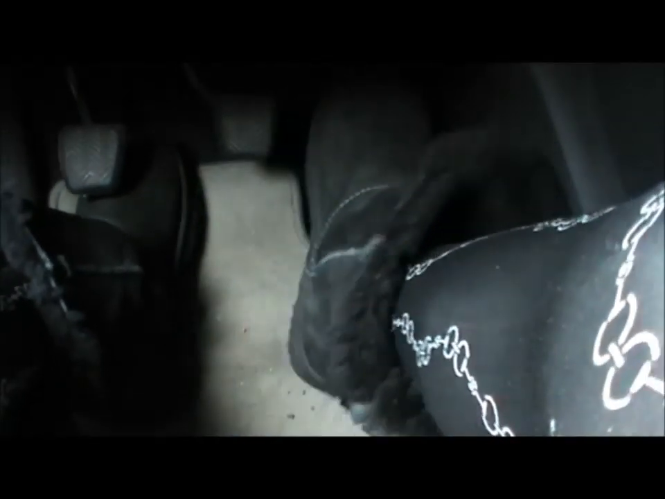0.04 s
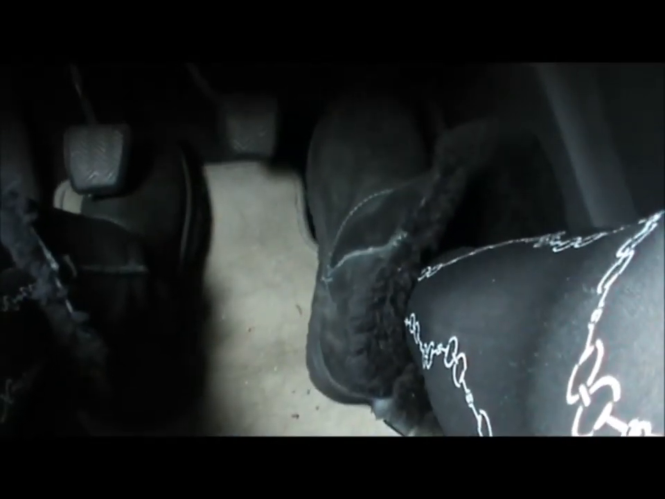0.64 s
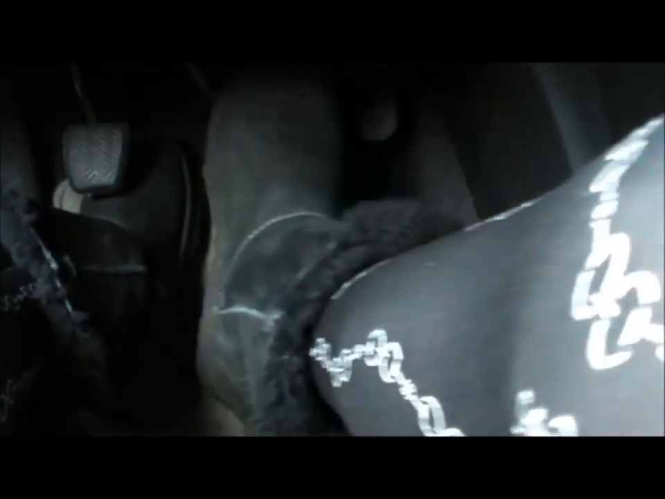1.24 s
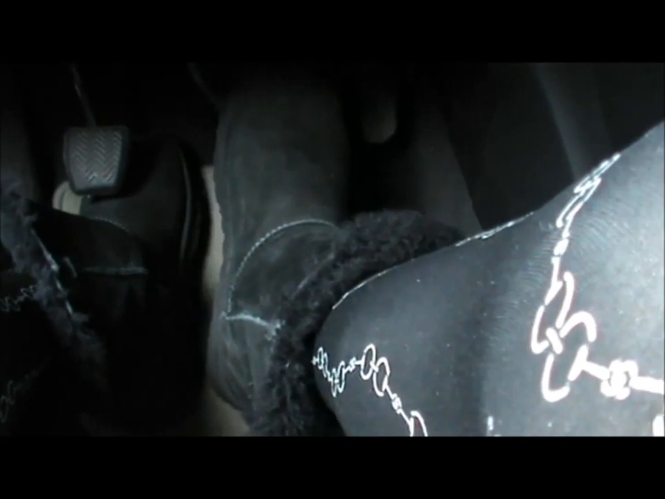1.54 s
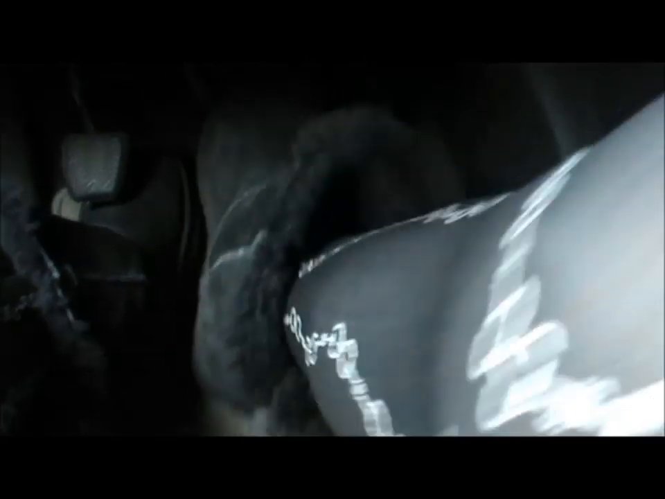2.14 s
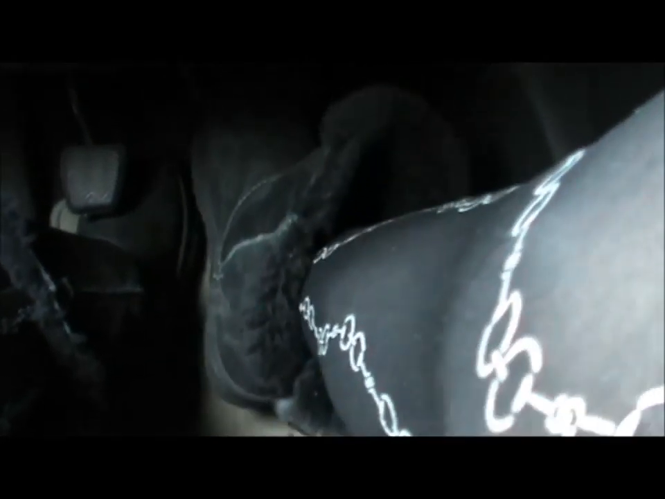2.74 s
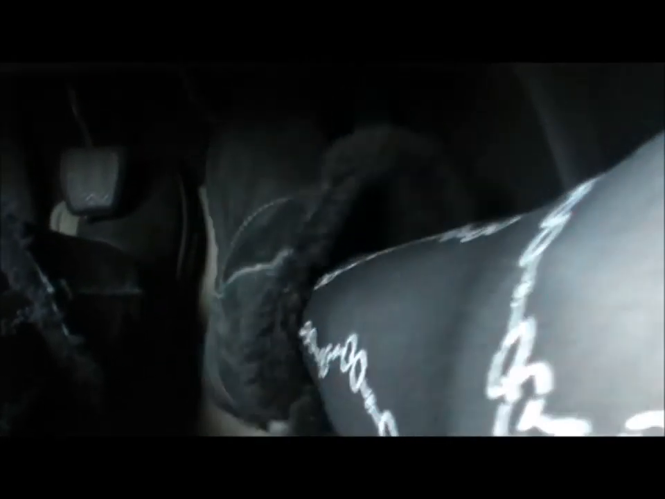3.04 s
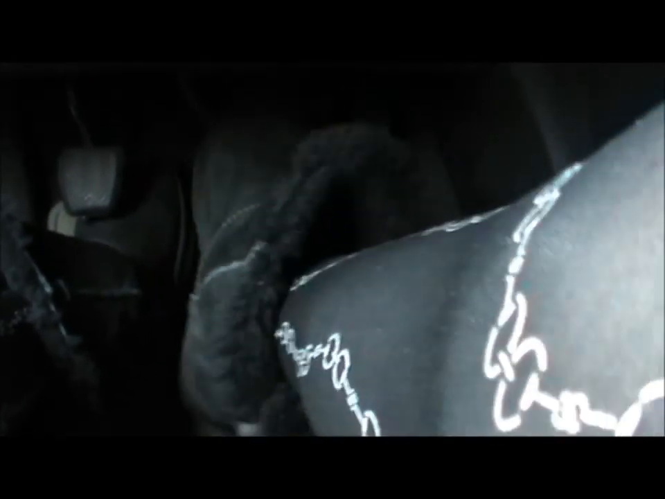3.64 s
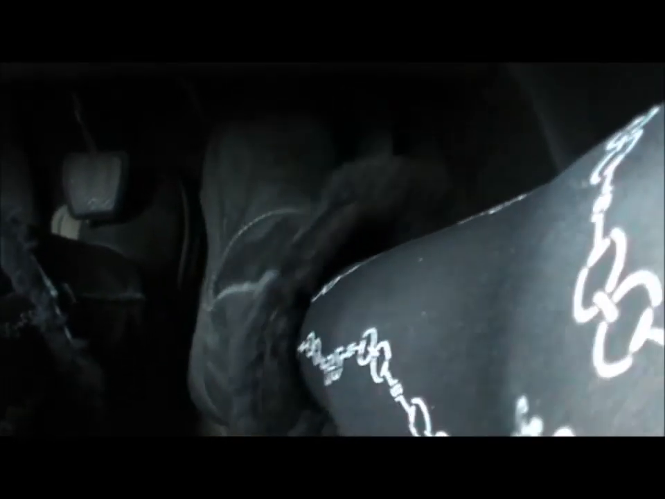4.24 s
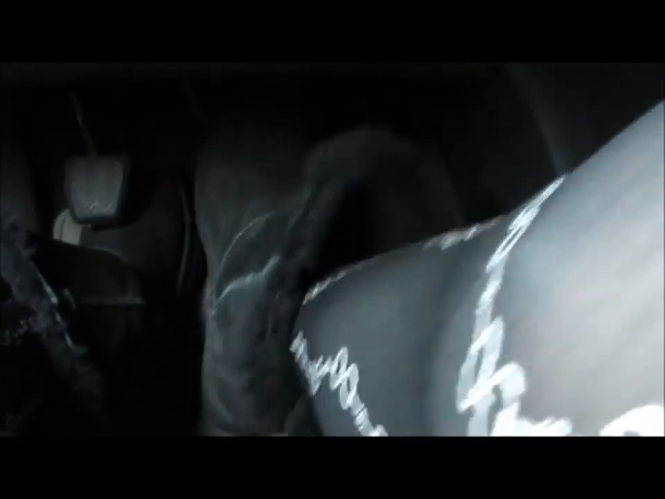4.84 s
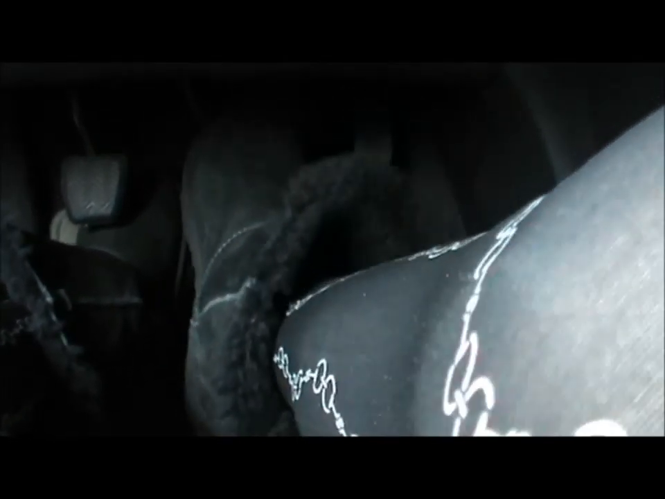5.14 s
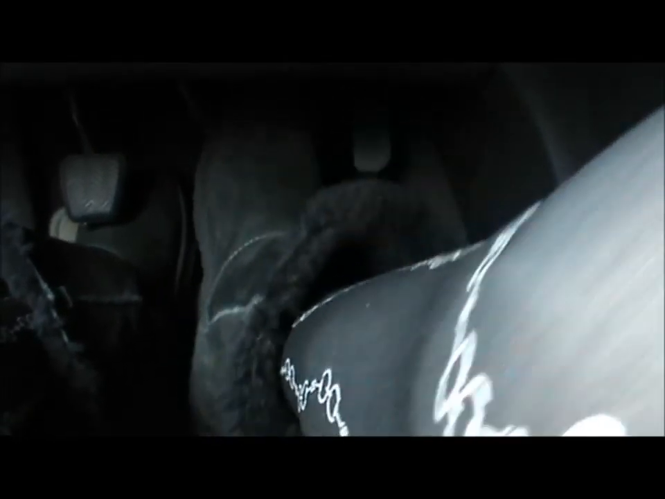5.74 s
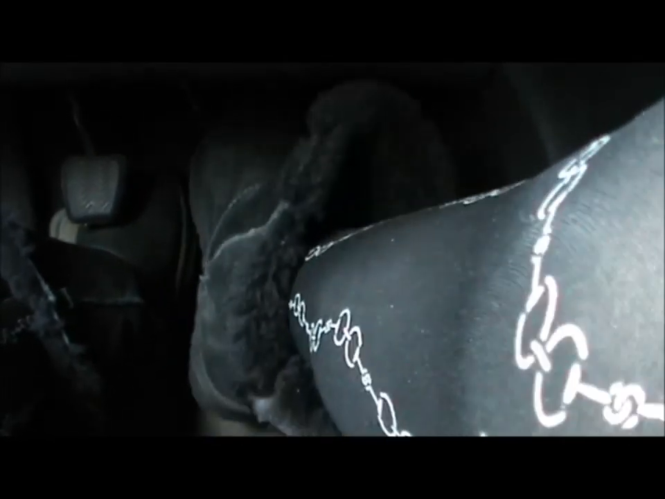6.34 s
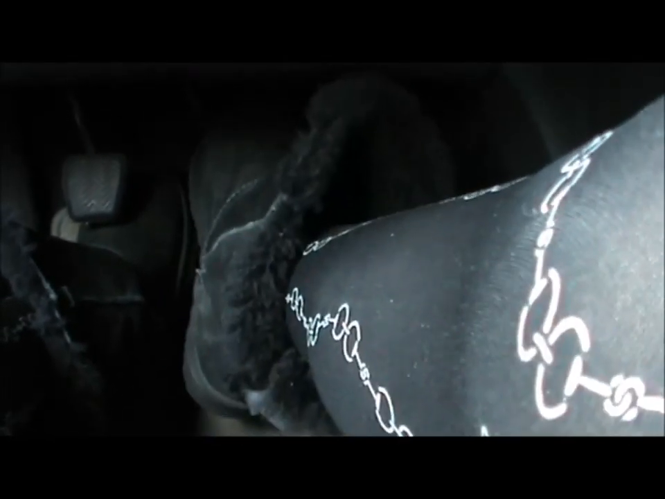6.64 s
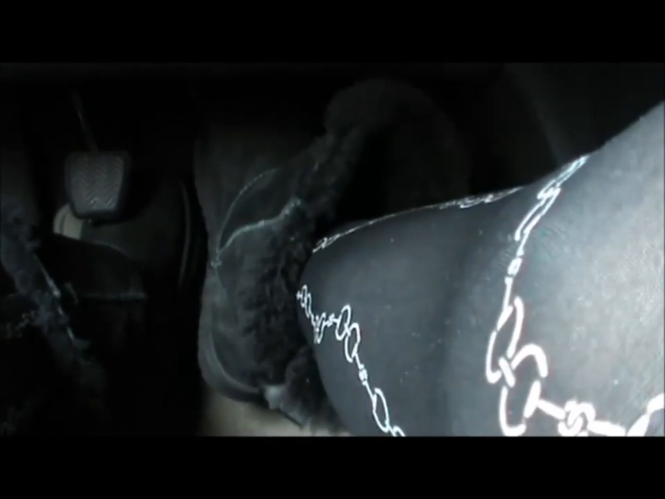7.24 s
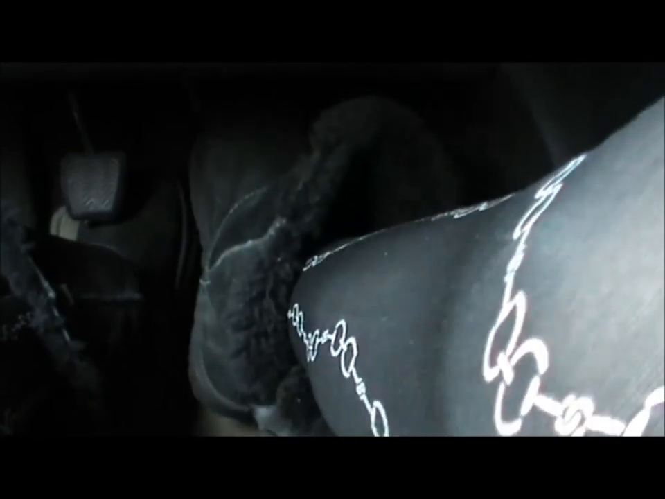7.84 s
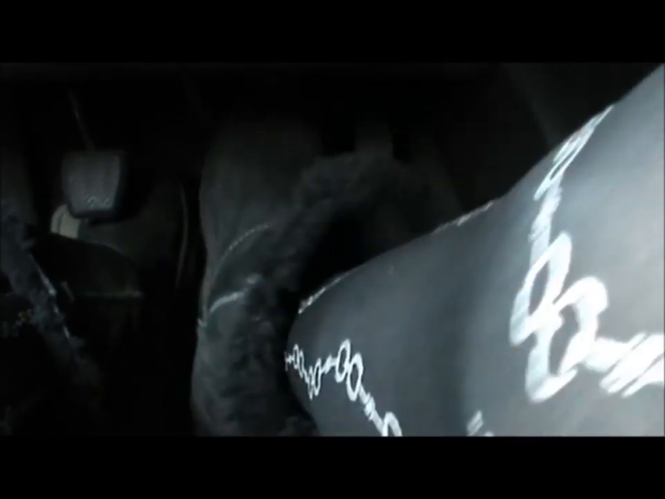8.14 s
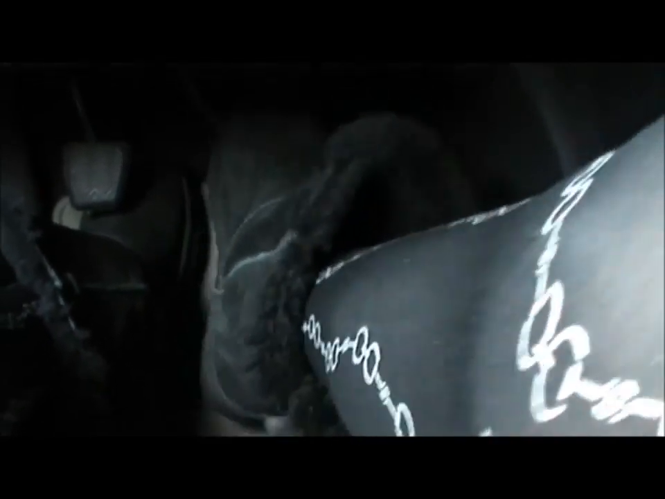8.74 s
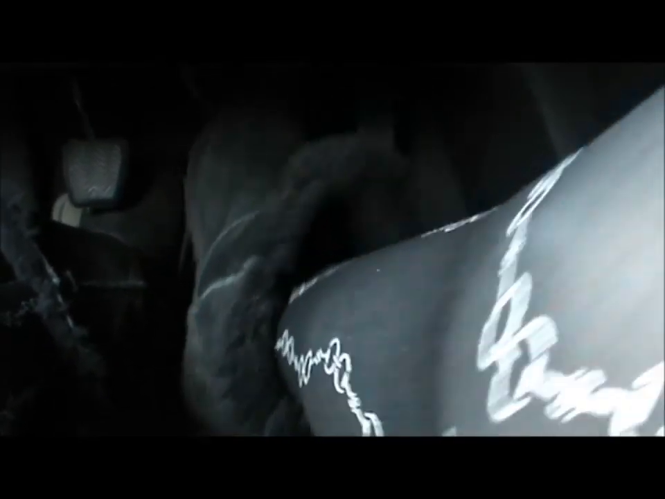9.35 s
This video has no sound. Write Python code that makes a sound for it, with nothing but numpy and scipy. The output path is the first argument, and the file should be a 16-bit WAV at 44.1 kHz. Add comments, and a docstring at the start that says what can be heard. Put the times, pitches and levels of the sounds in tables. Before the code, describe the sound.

Heard close up in a car's footwell, the engine gives one quick rev and settles to a low idle. A foot then pumps the brake pedal about three times a second. Each push makes a sharp click and a short rattling thump, and each release a hollow knock with a brief hiss of air. Two thin, faint squeaks come as the pumping starts. The strokes slow briefly, then quicken again.

```python
"""A foot pumps the brake pedal of an idling car, after one quick rev of the engine.
Each push clicks the pedal's linkage and shakes the box that holds the pedal. When let go, the pedal
knocks against its stop, and the brake booster (which helps the foot press) sucks a short hiss of air
through a valve that squeaks twice. Underneath, the engine's firings boom in the cabin."""
import sys
import numpy as np
from scipy import signal
from scipy.fft import rfft, irfft, next_fast_len
from scipy.io import wavfile
from scipy.ndimage import uniform_filter1d

SR = 44100
rng = np.random.default_rng(int(sys.argv[2]) if len(sys.argv) > 2 else 0)


def put_to_file(sound):
    """Save the sound as 16-bit audio at rate SR, in the file named by the first command-line argument."""
    columns = np.atleast_2d(sound).T  # one column per channel
    safe = np.clip(columns, -1, 1)
    whole_steps = np.round(safe * 32767)
    wavfile.write(sys.argv[1], SR, whole_steps.astype(np.int16))


N = 413658
TIME = np.arange(N) / SR
AGE = np.arange(SR * 2 // 5) / SR   # seconds since one short sound began
BINS = np.maximum(np.fft.rfftfreq(next_fast_len(N), 1 / SR), 1)


def from_db(db):
    return 10 ** (np.asarray(db) / 20)


def at_hz(points, hz):
    """Read a table at any pitch, sliding smoothly between its rows."""
    pitches, values = np.transpose(points)
    return np.interp(np.log(hz), np.log(pitches), values)


def drift(turns_per_s):
    """A random wander, mostly between -1 and 1."""
    knots = rng.standard_normal(int(N / SR * turns_per_s) + 2)
    return np.interp(TIME * turns_per_s, np.arange(len(knots)), knots)


def treble_share(hz):
    """0 in the bass, 1 in the treble."""
    return hz ** 2 / (hz ** 2 + 900 ** 2)


# How alike left and right sound. Each row: pitch in Hz, likeness from 0 to 1.
LIKENESS = [(60, 1), (500, 1), (800, 0.61), (1500, 0.56), (2200, 0.22), (6000, 0.48), (9000, 0.19),
            (15000, 0.33)]

def stereo(mid, side, hz):
    """Mix two unrelated noises into left and right, less alike in the treble."""
    alike = np.sqrt(np.clip(at_hz(LIKENESS, hz), 0, .999))
    mid, side = mid * np.sqrt(1 + alike), side * np.sqrt(1 - alike)
    return np.array([mid + side, mid - side])


def steady_noise(spectrum):
    """Even stereo noise with the given tone colour, at an average strength of 1."""
    mid, side = rfft(rng.standard_normal((2, next_fast_len(N)))) * from_db(at_hz(spectrum, BINS))
    noise = irfft(stereo(mid, side, BINS))[:, :N]
    return noise / np.sqrt(np.mean(noise ** 2) + 1e-20)


def bursts(starts, spectrum, envelope, spread_db=1.43):
    """A hit rings so many notes that they blur into noise; envelope(hz) shapes each band over time."""
    edges = 44 * 2 ** (np.arange(18) / 2)   # Hz, half an octave apart
    centres = np.sqrt(edges[1:] * edges[:-1])
    gains = from_db(at_hz(spectrum, centres))
    gains /= np.sqrt(np.sum(gains ** 2 * np.diff(edges)) * 2 / SR)
    size = envelope(centres[0]).shape[1]
    white, sounds = rng.standard_normal((len(starts), 2, 2, size)), 0
    for k, hz in enumerate(centres):
        bandpass = signal.butter(2, edges[k:k + 2], "band", fs=SR, output="sos")
        band = signal.sosfilt(bandpass, white[:, k % 2])
        colour = from_db(spread_db * rng.standard_normal((len(starts), 1)))   # no two hits are alike
        sounds = sounds + stereo(band[:, 0], band[:, 1], hz) * (gains[k] * colour * envelope(hz))
    out = np.zeros((2, N + size))
    for k, start in enumerate(starts):
        at = max(int(start * SR), 0)
        out[:, at:at + size] += sounds[:, k]
    return out[:, :N]


def strike(times, db, treble_db, notes, spread_db):
    """Each tap rings all the notes of a part, each with a strength of its own."""
    at, out = np.clip((times * SR).astype(int), 0, N - 1), np.zeros(N)
    chance_db = spread_db * rng.standard_normal((len(at), len(notes)))
    for k, (hz, note_db, ring_s) in enumerate(notes):
        taps = np.full(N, 1e-18)
        taps[at] = (-1) ** k * from_db(db + note_db + treble_db * treble_share(hz) + chance_db[:, k])
        fade, turn = np.exp(-np.log(1000) / (ring_s * SR)), 2 * np.pi * hz / SR
        out += signal.lfilter([0, np.sin(turn)], [1, -2 * fade * np.cos(turn), fade * fade], taps)
    return out


def resonate(sound, resonances):
    """Boost a sound around the pitches at which a part likes to ring."""
    for hz, width_hz, boost_db in resonances:
        b, a = signal.iirpeak(hz, hz / width_hz, fs=SR)
        sound = sound + (from_db(boost_db) - 1) * signal.lfilter(b, a, sound + 1e-18)
    return sound


# The engine's speed during the rev. Each row: time in seconds, firings per second.
REV = [(0.62, 30.6), (0.69, 36.6), (0.96, 64.3), (1.0, 69.6), (1.09, 68.7), (1.32, 57.9), (1.92, 40.3),
       (2.06, 32.7), (2.32, 29.5), (2.7, 27.7)]
IDLE_HZ, REV_START_S, REV_END_S = 25.6, .5, 3.1

def firing_rate():
    """Firings per second: idle, one quick rev, and back to idle."""
    times, rates = np.transpose([(REV_START_S, IDLE_HZ), *REV, (REV_END_S, IDLE_HZ)])
    return np.interp(TIME, times, rates)


def engine_levels(firing, revved, full_load_hz_per_s=165):
    """Boom and clatter in dB: both grow with speed; speeding up hard trades boom for clatter."""
    load = np.clip(np.gradient(firing) * SR / full_load_hz_per_s, 0, 1)
    load = uniform_filter1d(load, size=SR // 10)
    before_rev = np.interp(TIME, [REV_START_S, TIME[np.argmax(firing)]], [1, 0])
    boom_db = -36 + 12 * revved - 4.5 * load
    clatter_db = -39.5 + 2.5 * np.log2(firing / IDLE_HZ) + 4.5 * load - 3 * before_rev
    return boom_db, clatter_db


# The engine's tones. Each row: multiple of the firing rate, relative dB at idle, the same when revved.
ENGINE_TONES = [(1, -3, -2), (1.5, -22, -18), (2, -1, -12), (3, -22, -17), (3.5, -22, -23), (4, -17, -23),
                (5, -16, -25), (7, -16, -29), (10.5, -15, -30)]
# Pitches at which the cabin booms. Each row: pitch in Hz, width in Hz, boost in dB.
CABIN = [(53.5, 3, 2.5), (97, 12, 7), (139, 12, 6)]
# The tone colour of the engine's clatter. Each row: pitch in Hz, relative level in dB.
CLATTER = [(20, 1.5), (60, -9.5), (170, 0), (300, 0), (450, -1), (640, -3.5), (900, -10), (1100, -14.5),
           (1400, -17.5), (1620, -15.5), (1900, -22), (2600, -28), (5000, -33.5), (16000, -38.5)]

def engine(wobble=0.0064, waver_db=3.0, rev_waver_db=1.5, throb=0.15):
    """The firings boom in the cabin, less evenly when revved; the clatter throbs with each firing."""
    firing = firing_rate()
    phase = 2 * np.pi * np.cumsum(firing * (1 + wobble * drift(10))) / SR
    revved = np.interp(firing, [27, 48], [0, 1])
    boom_db, clatter_db = engine_levels(firing, revved)
    boom = 0
    for multiple, idle_db, revved_db in ENGINE_TONES:
        cabin_db = sum(boost_db / (1 + (2 * (multiple * firing - hz) / width_hz) ** 2)
                       for hz, width_hz, boost_db in CABIN)
        uneven_db = (waver_db + rev_waver_db * revved) * drift(26)
        level = from_db(boom_db + idle_db + revved * (revved_db - idle_db) + cabin_db + uneven_db)
        boom = boom + np.sqrt(2) * level * np.sin(multiple * phase + rng.uniform(0, 2 * np.pi))
    clatter = from_db(clatter_db) * (1 + throb * np.cos(phase)) * steady_noise(CLATTER)
    return boom + clatter


# The tone colour of the background. Each row: pitch in Hz, relative level in dB.
BACKGROUND = [(100, -14), (1500, -3), (3000, 2.5), (6000, -0.5), (13000, -2), (16000, -2)]

def background_hiss(level_db=-56.5):
    """A faint, even hiss lies under everything."""
    return from_db(level_db) * steady_noise(BACKGROUND)


# Pushes on the pedal. Each row: start in seconds, length in seconds, relative level in dB, extra treble
# in dB, extra thump in dB, relative dB of the snap, rebound and catch clicks, and how many seconds
# before the snap the shoe lands (0 if it already rests there).
PUSHES = [(.0, 0.034, -26.5, -33, 1, -70, -70, -70, 0), (2.173, 0.015, -16.5, -7, -1, -8, -34, -41, .026),
          (2.208, 0.048, -14, 2, -4, -12, -19, -32, 0), (2.478, .015, -15, -5, -6, -21, -38, -45, .021),
          (2.515, .027, -18, 5, 5, -20, -36, -27, 0), (2.994, .069, -17, -1, -1.5, -26, -41, -15.5, .028),
          (3.252, 0.077, -15.5, 2, 1.5, -4, -9, -6, 0.031),
          (3.476, 0.063, -13, -1.5, -5.5, -5.5, -26, -9.5, .038),
          (3.675, 0.06, -16.5, -1, 9.5, -10, -17, -19, 0.032),
          (3.867, 0.044, -13, -2, -8, -9.5, -9.5, -18, 0.032),
          (4.103, 0.046, -14.5, 2.5, 0, -7.5, -27.5, -12, 0.03),
          (4.350, .07, -15.5, 1, -5, -7, -9, -13.5, 0), (4.757, .024, -12.5, 1.5, -8.5, -10, -20, -32, 0),
          (5.149, 0.046, -13, 2, -2, -7.5, -8.5, -18, .04), (5.456, 0.064, -15.5, 2, 3, -8, -10, -20, 0),
          (5.793, .05, -14, 1, 0, -8.5, -13, -37, 0), (6.148, .044, -15, 1, 3.5, -8, -8.5, -34, 0),
          (6.900, 0.034, -13.5, 1, 8, -11.5, -30, -28, 0.036),
          (7.526, 0.051, -16.5, 6, 1, -11, -11, -25, 0.034),
          (8.071, 0.066, -15, 4.5, 1.5, -14.5, -7, -12.5, 0.035),
          (8.301, 0.057, -14, -2.5, -1.5, -10, -7.5, -11.5, .027),
          (8.495, 0.044, -13.5, -1.5, -7, -7.5, -9.5, -14.5, 0.028),
          (8.711, .033, -14.5, 1, -5.5, -11, -14.5, -30, 0.035),
          (9.101, 0.055, -16.5, 4.5, 3.5, -7.5, -7, -17, 0)]
# The tone colour of the shudder. Each row: pitch in Hz, relative level in dB.
SHUDDER = [(50, -2), (100, 5.5), (180, 0), (260, 6), (350, -7.5), (500, 4), (700, -14.5), (950, -5.5),
           (1500, -19), (2200, -25.5), (3200, -21.5), (5000, -28), (12000, -33), (16000, -56)]
# How long the space around the feet rings. Each row: pitch in Hz, seconds to fade by 60 dB.
RING = [(60, 0.71), (250, 0.27), (500, 0.1), (1200, 0.11), (3000, 0.064), (8000, 0.054), (16000, 0.038)]

def shudders(level_db=-8.0, rise_s=0.00033, dulling=0.11, rattle_db=12, rattle_hz=85, uneven_db=4):
    """The pedal box shudders and rattles while the pedal moves; the treble stops first as it slows."""
    start, length, db, treble_db, thump_db, *_ = np.transpose(PUSHES)[:, :, None]
    # the pedal sticks and slips over and over, heard most in the treble
    slips = np.cumsum(rattle_hz * from_db(uneven_db * drift(100))) / SR
    rattle = .5 - np.interp(start + AGE, TIME, slips) % 1
    def envelope(hz):
        held_s = length * min(1, (hz / 400) ** -dulling)
        fade_db = -60 * np.maximum(AGE - held_s, 0) / at_hz(RING, hz)
        thump_share = np.exp(-(np.log2(hz / 255) / 0.27) ** 2)   # the box thumps near 255 Hz
        colour_db = thump_db * thump_share + (treble_db + rattle_db * rattle) * treble_share(hz)
        return (1 - np.exp(-AGE / rise_s)) * from_db(db + colour_db + fade_db)
    return from_db(level_db) * bursts(start[:, 0], SHUDDER, envelope)


# The notes of the pedal box. Each row: pitch in Hz, relative level in dB, seconds to fade by 60 dB.
BOX_NOTES = [(258, 0, .14), (380, -4, .1), (468, -2, .08), (750, -5, .06), (838, -5, .06), (1205, -2, .07),
             (1586, -2, .075), (1695, -6, .06), (1872, -5, .06), (2470, -10, .05), (3346, -7, .05)]

def jerks(level_db=-10, slowing_db=-7, spread_db=0.1, reach=.75, count=4):
    """The pedal moves in a few uneven jerks, each ringing the pedal box more dully than the last."""
    start, length, db, treble_db, *_ = np.transpose(PUSHES)[:, :, None]
    travel = (np.arange(count) + rng.random((len(start), count))) / count
    times = (start + reach * length * travel).ravel()
    jerk_treble_db = (treble_db + slowing_db * travel).ravel()
    return strike(times, np.repeat(db + level_db, count), jerk_treble_db, BOX_NOTES, spread_db)


def engine_ticks(level_db=-49, spread_db=3.0, ring_hz=1610, ring_s=.05):
    """One engine valve ticks lightly, once in every four firings."""
    cycles = np.floor(np.cumsum(firing_rate()) / SR / 4)
    times = TIME[1:][np.diff(cycles) > 0]
    return strike(times, level_db, 0, [(ring_hz, 0, ring_s)], spread_db)


def click_events(ahead_s=.003, rebound_s=0.014, catch_s=0.032, knock_click_db=-15.5):
    """List clicks as (seconds, dB): a push snaps, rebounds and catches; a knock clicks once."""
    rows = [(start, db + treble_db + knock_click_db) for start, db, treble_db, _ in KNOCKS]
    for start, *_, snap_db, rebound_db, catch_db, touch_s in PUSHES:
        snap = start - ahead_s
        rows += [(snap, snap_db), (snap + rebound_s, rebound_db), (snap + catch_s, catch_db)]
        if touch_s > rebound_s:   # the shoe ticks as it lands: the earlier, the fainter
            rows.append((snap - touch_s, -12 - 330 * touch_s))
    return rows


# The tone colour of the linkage's scrapes and clicks. Each row: pitch in Hz, relative level in dB.
LINKAGE = [(100, -3), (500, 11.5), (1000, 6), (1800, 1.5), (2500, 4.5), (5000, 4), (7000, 2.5), (9000, 5.5),
           (12500, 2), (16000, -13)]

def scrapes(level_db=-27, swell_s=0.0067, lead_s=0.01):
    """Just before it snaps shut, the loose linkage scrapes, swelling into the click."""
    start, db = np.transpose(click_events())[:, :, None]
    age = AGE[:len(AGE) // 10]
    swell = from_db(db + level_db) * np.exp(-abs(age - lead_s) / swell_s)
    return bursts(start[:, 0] - lead_s, LINKAGE, lambda hz: swell)


def clicks(level_db=-11, rise_s=0.002, snap_s=0.0027, tail_db=-13, early_s=.002, damping=0.39):
    """The gap in the linkage closes with a bright snap and a short ring."""
    start, db = np.transpose(click_events())[:, :, None]
    age = AGE[:len(AGE) // 4]
    closing = age ** 4 / (rise_s ** 4 + age ** 4)
    snap = np.exp(-(age / snap_s / 2) ** 2)
    def envelope(hz):
        tail = np.exp(-np.log(1000) * damping * age / at_hz(RING, hz))
        return from_db(db + level_db) * closing * (snap + from_db(tail_db) * tail)
    return bursts(start[:, 0] - early_s, LINKAGE, envelope)


# Knocks of a pedal or foot. Each row: time in seconds, relative level in dB, extra treble in dB,
# relative level of the booster's air in dB (around -80 is too faint to hear).
KNOCKS = [(.244, -20, -25, -79), (1.02, -19.5, -3, -86), (1.976, -10, 4.5, -22.5), (2.288, -10.5, 2, -25),
          (2.534, -17, 8.5, -88), (2.625, -9.5, 1, -26), (3.018, -11, -4, -86), (3.129, -10, 4, -25.5),
          (3.342, -11, 0, -29.5), (3.546, -29, -5, -31.5), (3.739, -25.5, 9.5, -32.5),
          (3.933, -11, -6, -32), (4.165, -17.5, 5.5, -28), (4.465, -11.5, -0.5, -31.5),
          (4.86, -13.5, -2.5, -29.5), (5.235, -15, 0, -30), (5.558, -10.5, 5, -31),
          (5.88, -21.5, -7, -29.5), (6.245, -12, -1.5, -28.5), (7.006, -11.5, 3, -28.5),
          (7.624, -13, -8.5, -28), (8.168, -22, -3, -80), (8.179, -10.5, -18, -29.5),
          (8.362, -23, 7.5, -32.5), (8.558, -19, -15, -31.5), (8.768, -47, -11, -31.5),
          (9.203, -10, -7, -28.5), (9.265, -23.5, 6.5, -88)]
# The tone colour of the clack. Each row: pitch in Hz, relative level in dB.
CLACK = [(50, -12), (110, -5.5), (220, -7), (380, -2), (540, 4), (700, -28), (900, -18), (1500, -13.5),
         (2100, -30), (2700, -23), (4000, -31.5), (7000, -35.5), (16000, -49)]
# The notes of the pedal arm and stop. Each row: pitch in Hz, relative dB, seconds to fade by 60 dB.
ARM_NOTES = [(108, -24.5, 0.047), (260, -29, 0.04), (380.4, -4, 0.13), (509, -0.5, 0.11), (570.4, 1, 0.082),
             (650, -0.5, 0.031), (1204, -3.5, 0.017), (1298, -12.5, 0.085), (1583, -3.5, 0.04),
             (1925, -13.5, 0.024), (2450, -9.5, 0.028), (2786, -8, 0.029), (3330, -5, 0.009)]

def knocks(clack_db=-10, rise_s=0.00025, contact_s=0.0078, damping=1.25, arm_db=-7, spread_db=2.5,
           graze_s=.005, graze_db=-16):
    """A pedal or foot knocks: a light graze, then a hard clack and a hollow ring."""
    start, db, treble_db, _ = np.transpose(KNOCKS)[:, :, None]
    age = np.maximum(AGE - graze_s, 0)
    attack = 1 - np.exp(-age / rise_s) + from_db(graze_db) * (AGE < graze_s)
    def envelope(hz):
        fade = np.exp(-np.log(1000) * damping * np.maximum(age - contact_s, 0) / at_hz(RING, hz))
        return attack * from_db(db + treble_db * treble_share(hz)) * fade
    arm = strike(start[:, 0], db[:, 0] + arm_db, treble_db[:, 0], ARM_NOTES, spread_db)
    return from_db(clack_db) * bursts(start[:, 0] - graze_s, CLACK, envelope) + arm


def air_rushes(peak_after_s=0.032, usual_db=-29.5, usual_swell_s=0.016, doubling_db=9.5):
    """List the booster's gulps of air as (start in seconds, dB, seconds to swell)."""
    rows = [(1.35, -44, 0.058)]   # the first, slow press on the brake only draws air
    for knock_s, _, _, air_db in KNOCKS:
        swell_s = usual_swell_s * 2 ** ((air_db - usual_db) / doubling_db)   # louder takes longer
        rows.append((knock_s + peak_after_s - swell_s, air_db, swell_s))
        rows.append((knock_s + 0.099, air_db - 23, 0.049))   # a faint gulp as the pressure evens out
    return rows


# The tone colour of the rushing air. Each row: pitch in Hz, relative level in dB.
HISS = [(200, 25.5), (800, 7), (2200, 5.5), (3300, 6.5), (4500, 2.5), (5600, 2.5), (7000, 1), (8700, 4.5),
        (11500, 6.5), (13000, -3), (16000, -7)]
# Pitches at which the booster's valve rings. Each row: pitch in Hz, width in Hz, boost in dB.
VALVE = [(3460, 170, 6.5), (4530, 250, 8), (5070, 200, 1.5), (6970, 150, 11), (7630, 340, 6.5)]
# Whistles that sink as the rush eases. Each row: start pitch, end pitch and width in Hz, relative dB.
WHISTLES = [(8400, 7750, 750, -8), (13100, 12450, 600, -11)]

def booster(level_db=-3, tail_db=-23, tail_s=0.32, whistle_onset_db=-41, detune=0.0067):
    """Air rushes through the valve and fades as the pressure evens out; only a strong flow whistles."""
    flow, pressure, tuning = np.zeros(N), np.zeros(N), np.ones(N)
    for start, db, swell_s in air_rushes():
        at = int(start * SR)
        age = AGE[:max(N - at, 0)]
        rush = age / swell_s * np.exp(1 - age / swell_s)
        leak = from_db(tail_db) * (1 - np.exp(-age / swell_s)) * np.exp(-age / tail_s)
        flow[at:at + len(age)] += from_db(db + level_db) * (rush + leak)
        if db > whistle_onset_db:
            pressure[at:at + len(age)] = np.exp(-(age / swell_s) ** 2)
            tuning[at:] = 1 + detune * rng.standard_normal()   # it never opens the same way twice
    air = resonate(steady_noise(HISS), VALVE)
    whistling = flow ** 2 / (flow ** 2 + from_db(whistle_onset_db) ** 2)
    for start_hz, end_hz, width_hz, db in WHISTLES:
        hz = tuning * (end_hz + (start_hz - end_hz) * pressure)
        phase = 2 * np.pi * np.cumsum(hz) / SR
        whistle = drift(width_hz) * np.cos(phase) + drift(width_hz) * np.sin(phase)
        air = air + from_db(db) * whistling * whistle
    return flow * air


# Valve squeaks. Each row: start and length in seconds, first and last pitch in Hz, level in dB.
SQUEAKS = [(2.03, 0.066, 5330, 5070, -39), (2.347, 0.12, 5430, 5000, -43)]

def squeaks(waver=0.016):
    """The booster's nearly closed valve sings a thin, slightly falling note."""
    out, unsteady = np.zeros(N), 1 + waver * drift(300)
    for start, length, start_hz, end_hz, db in SQUEAKS:
        on = (TIME > start) & (TIME < start + length)
        progress = (TIME[on] - start) / length
        hz = (start_hz + (end_hz - start_hz) * progress) * unsteady[on]
        out[on] += from_db(db) * np.sin(np.pi * progress) * np.sin(2 * np.pi * np.cumsum(hz) / SR)
    return out


# Where the pedal box and the space around it ring. Each row: pitch in Hz, width in Hz, boost in dB.
FOOTWELL = [(260, 47, 8.5), (385, 34, 5), (454.5, 8.8, 5), (490, 64, 9.5), (775, 37, 1.5), (811, 21, 4.5),
            (1230, 180, 5.5), (1594, 110, 8.5), (1917, 150, 6.5), (2426, 30, 9), (2640, 62, 6.5),
            (3260, 136, 6.5), (6520, 410, 7.5), (12450, 360, 11)]

def scene():
    """Pedal, booster and engine over a faint hiss."""
    pedal = resonate(shudders() + scrapes() + clicks(), FOOTWELL) + jerks() + knocks()
    return pedal + booster() + squeaks() + engine() + engine_ticks() + background_hiss()


# How much louder the left side is than the right. Each row: pitch in Hz, level gap in dB.
LEFT_LOUDER = [(60, -3.5), (110, -4), (200, -3.5), (380, -1.5), (700, -0.5), (1290, 0.5), (2380, 1.0),
               (4400, 1), (8120, 0.5), (15000, -0.5)]
# How far the left wave runs ahead of the right. Each row: pitch in Hz, lead in radians.
LEFT_AHEAD = [(30, -0.19), (150, -1.1), (260, -0.77), (400, -1.04), (650, -0.89), (1000, -0.29),
              (1700, 0.41), (2800, -0.62), (4000, -0.74), (6400, 0.87), (9400, 0.17), (15000, -0.34)]

def record(dry, ceiling=0.85, cutoff_hz=15700):
    """Set left and right apart in level and timing, round off the peaks and cut the highest treble."""
    half_gap = from_db(at_hz(LEFT_LOUDER, BINS) / 2) * np.exp(.5j * at_hz(LEFT_AHEAD, BINS))
    sides = irfft(rfft(dry, next_fast_len(N)) * np.array([half_gap, 1 / half_gap]))[:, :N]
    rounded = ceiling * np.tanh(sides / ceiling)
    return signal.sosfilt(signal.ellip(10, .2, 80, cutoff_hz, fs=SR, output="sos"), rounded)


dry = scene()
out = record(dry)
put_to_file(out)
```